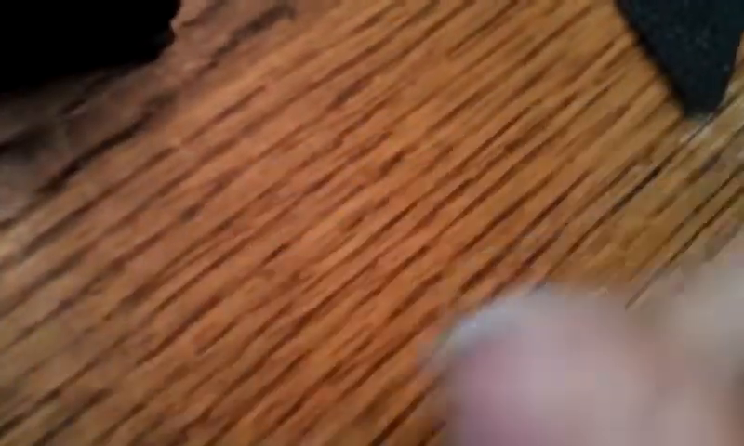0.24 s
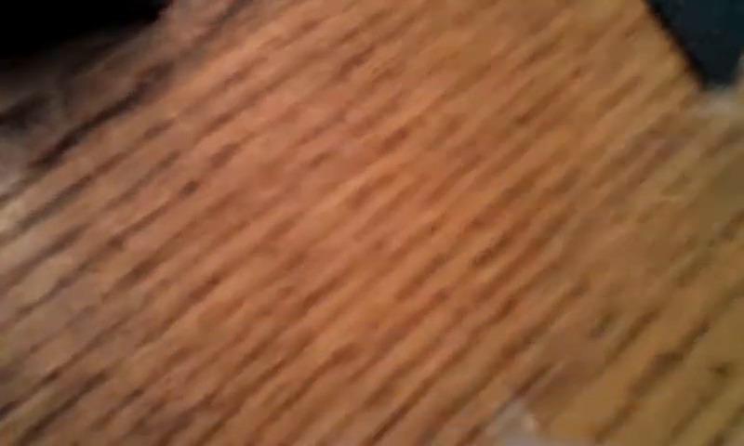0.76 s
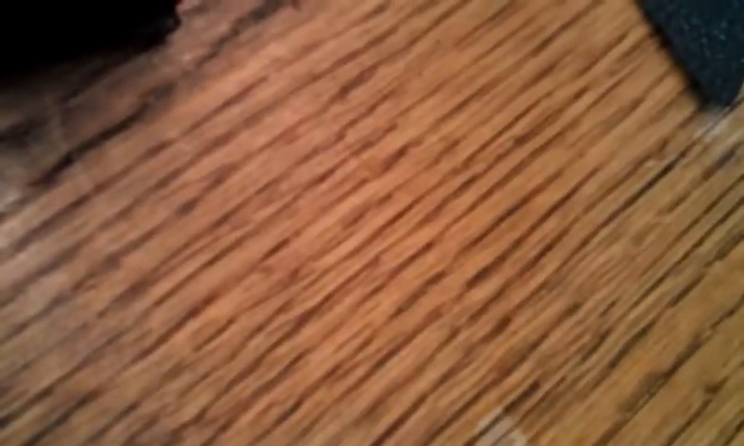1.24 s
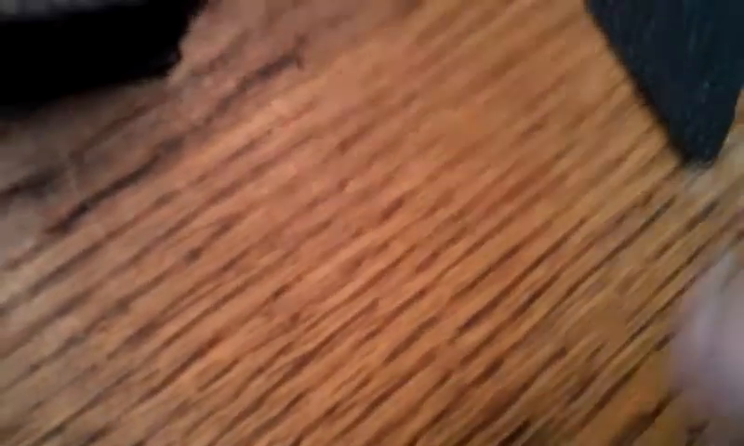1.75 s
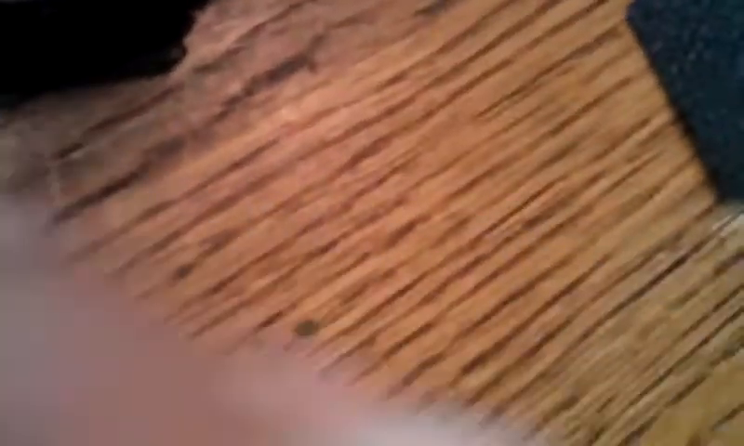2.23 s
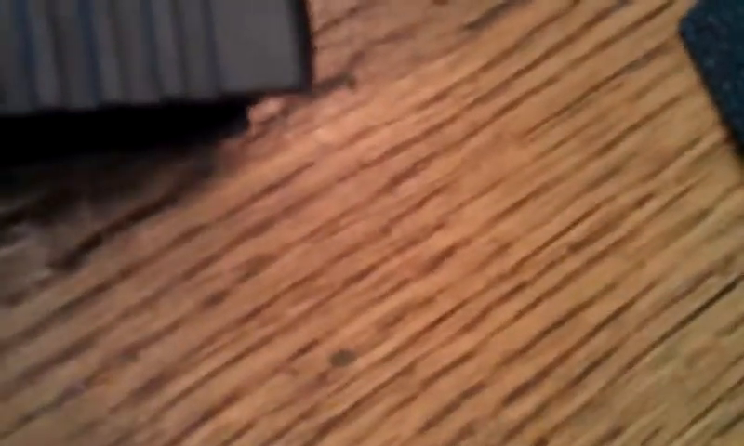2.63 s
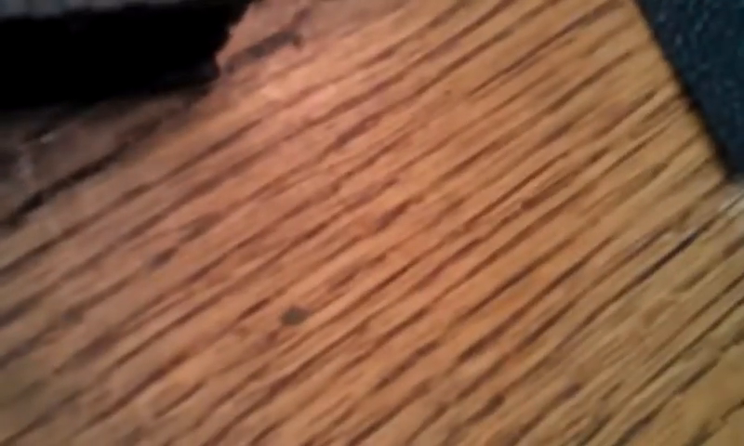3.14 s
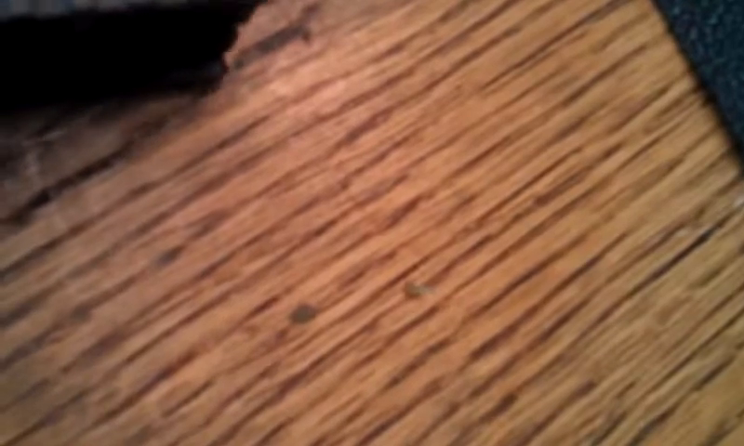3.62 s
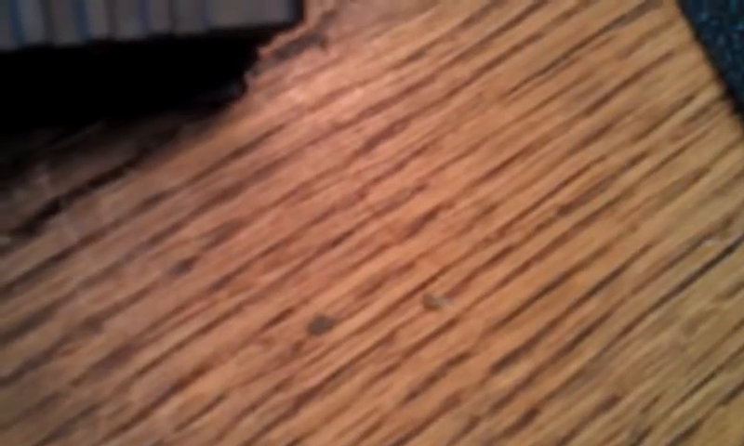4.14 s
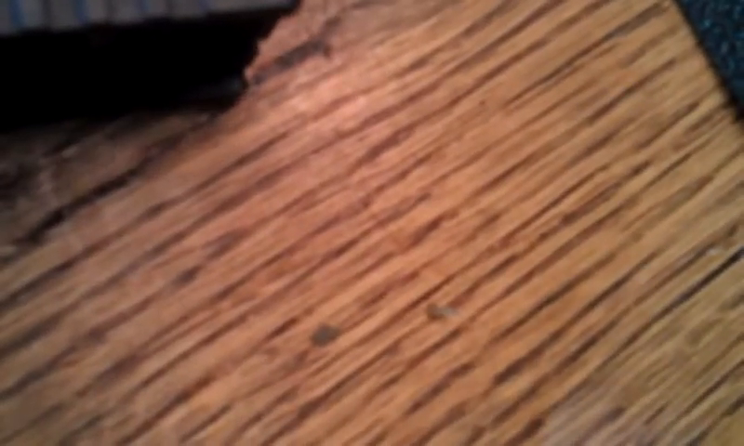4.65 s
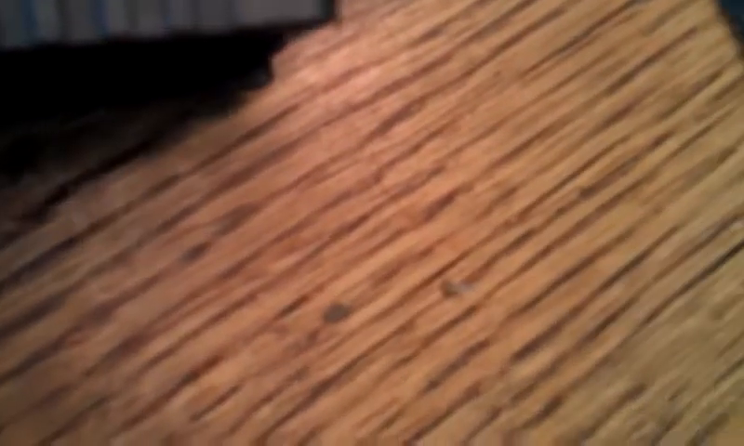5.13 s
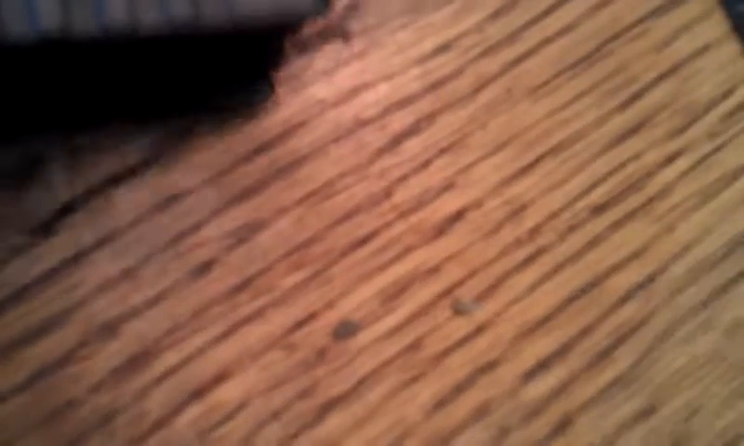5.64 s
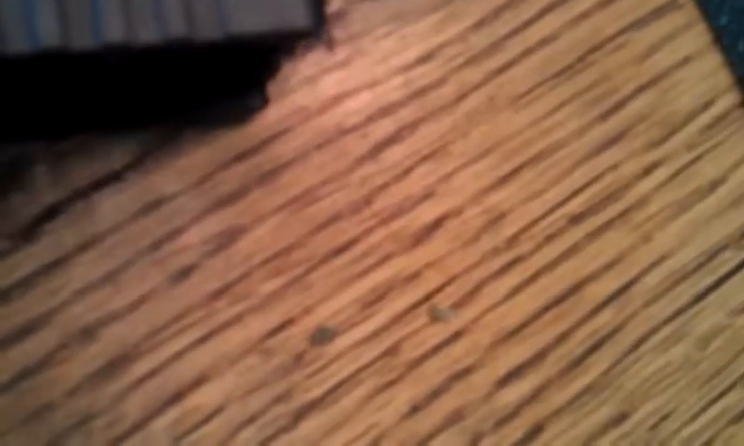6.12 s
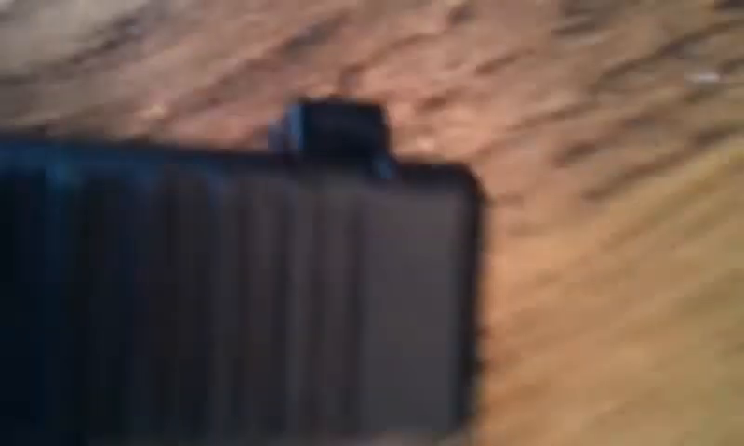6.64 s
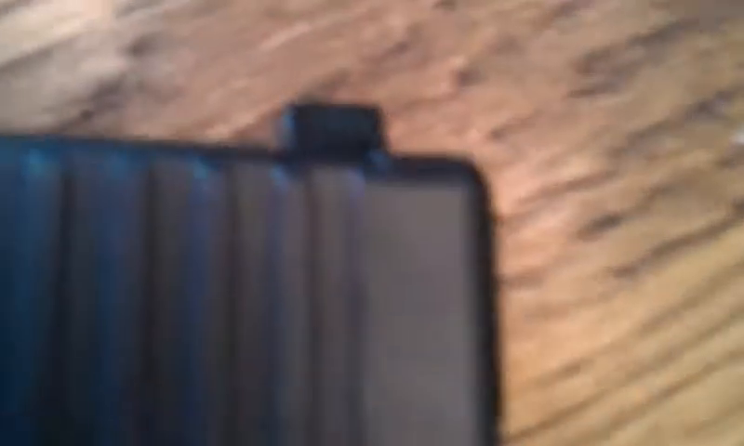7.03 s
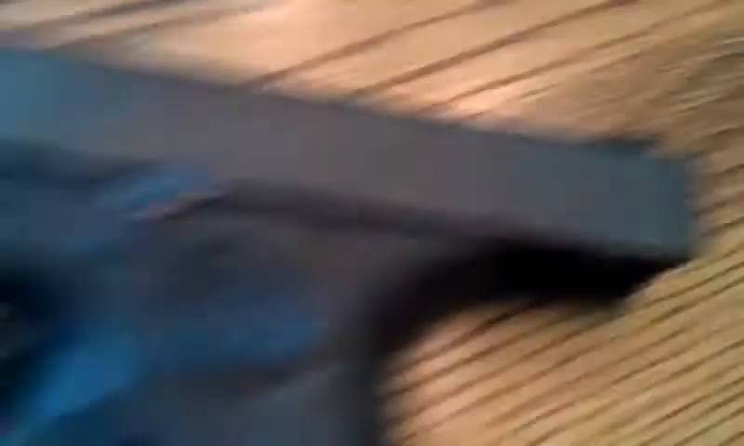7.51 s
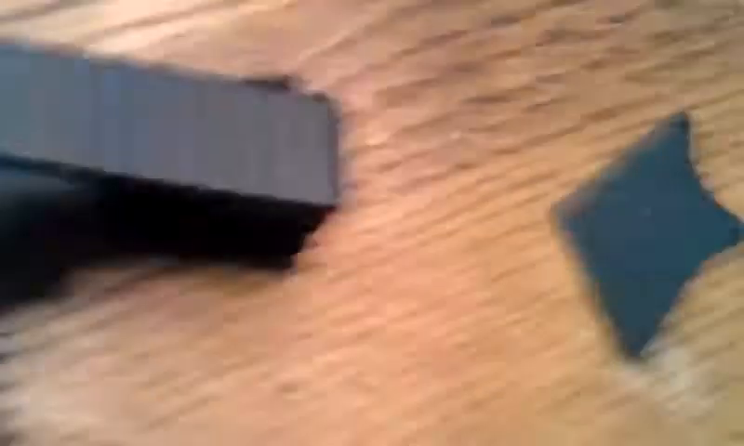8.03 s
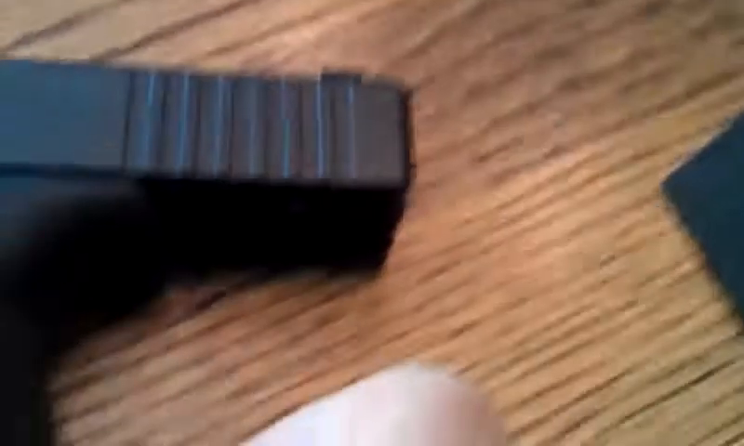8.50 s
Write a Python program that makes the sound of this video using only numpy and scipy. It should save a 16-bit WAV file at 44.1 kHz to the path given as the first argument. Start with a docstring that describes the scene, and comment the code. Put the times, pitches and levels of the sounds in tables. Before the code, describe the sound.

Hard plastic and steel parts knock on a wooden tabletop, each set-down a bright clack with a short woody thud, small rebounds and loose-part rattle. Early knocks are spaced apart with soft finger brushing between; later ones bunch up, loudest around six seconds and slightly distorted. Close, dry indoor pickup, with little bass and quiet room tone.

```python
"""A pistol and a phone are shifted about on a wooden table in a small quiet room, close to the microphone.
A loud blow comes at once; until about 5 s set-downs, rocking, bumps, ticks and faint rubs are spread out.
The contacts then crowd, with the loudest blows near 5.8 and 6.1 s, overloading the microphone, and a last
cluster near 7 s. Faint ticks and brushing fade into room tone. Hard contacts are bursts of tiny impulses with
modal ringing, bumps add tabletop modes, and slides and room tone are coloured noise."""
import sys
import numpy as np
from scipy import signal
from scipy.fft import rfft, irfft, next_fast_len
from scipy.io import wavfile
from scipy.ndimage import uniform_filter1d

SR = 44100
rng = np.random.default_rng(int(sys.argv[2]) if len(sys.argv) > 2 else 0)


def digitize_waveform(pressure):
    """Quantize a signal to 16-bit integers and store it at the path in sys.argv[1].

    Rows of a 2-D input are taken as channels; values are limited to [-1, 1].
    """
    field = np.atleast_2d(pressure).T
    bounded = np.clip(field, -1, 1)
    quanta = np.round(bounded * 32767).astype(np.int16)
    wavfile.write(sys.argv[1], SR, quanta)


N = 386607
AGE_S = np.arange(16384) / SR   # time since a touch


def from_db(db):
    return 10 ** (np.asarray(db) / 20)


def unit_energy(x):
    return x / np.sqrt(np.sum(x ** 2) + 1e-20)


def dying(t60_s, size):
    """Exponential decay, -60 dB at t60_s."""
    return from_db(-60 * AGE_S[:size] / t60_s)


def add(track, t_s, sound):
    """Mix sound into track at t_s."""
    start = max(round(t_s * SR), 0)
    track[start:start + len(sound)] += sound[:N - start]


def band(x, low_hz, high_hz):
    """Butterworth band-pass; upper edge capped at 0.45 SR."""
    sos = signal.butter(2, [low_hz, min(high_hz, .45 * SR)], "band", fs=SR, output="sos")
    return signal.sosfilt(sos, x)


def colour(x, points):
    """Causal minimum-phase filter through (f/Hz, level/dB) points."""
    size = next_fast_len(2 * len(x), real=True)
    hz, db = np.transpose(points)
    log_hz = np.log(np.maximum(np.arange(size // 2 + 1) * SR / size, 1))
    log_gain = np.log(from_db(np.interp(log_hz, np.log(hz), db)))
    cepstrum = irfft(log_gain, size)
    # fold onto the causal side
    cepstrum[1:size // 2] *= 2
    cepstrum[size // 2 + 1:] = 0
    response = np.exp(rfft(cepstrum))
    return irfft(rfft(x, size) * response, size)[:len(x)]


def noise(spectrum, grain_db=0):
    """Coloured noise, rms 1; random level per 64 samples makes it gritty."""
    grain = np.repeat(rng.standard_normal(N // 64 + 1), 64)[:N]
    grains = rng.standard_normal(N) * from_db(grain_db * grain)
    return unit_energy(colour(grains, spectrum)) * np.sqrt(N)


def mode_shapes(modes, size):
    """One decaying sine per mode; its dB sets its energy."""
    shapes = []
    for hz, db, t60_s in modes:
        ring = np.sin(2 * np.pi * hz * AGE_S[:size]) * dying(t60_s, size)
        shapes.append(from_db(db) * unit_energy(ring))
    return np.array(shapes)


def strike(shapes, spread_db):
    """Each point of contact weights the modes anew, with random sign."""
    gains = from_db(spread_db * rng.standard_normal(len(shapes)))
    weights = gains * rng.choice([-1, 1], len(shapes))
    return weights @ shapes


def chatter(t60_s, size):
    """Dying flurry of tiny contacts: random-sign impulses, energy 1."""
    return unit_energy(rng.choice([-1, 1], size) * dying(t60_s, size))


# Room tone spectrum: f/Hz, relative density/dB per Hz
ROOM_TONE_SPECTRUM = [(15, -61), (25, -27), (48, -46), (87, -19), (236, -3), (263, -5), (363, -6.5),
                      (427, -11), (714, -13.5), (1070, -12.5), (1440, -17), (4030, -19.5), (6380, -24),
                      (12200, -23), (16000, -25)]


def room_tone(level_db=-66):
    """Steady coloured noise of the quiet room."""
    return from_db(level_db) * noise(ROOM_TONE_SPECTRUM)


# Slides over the wood: start t/s, end t/s, end rub level/dB, end hiss level/dB (both relative), swell/dB
SLIDES = [(0, .12, -66.5, -81.5, -18), (.93, 1.33, -64.5, -84.5, -5.5), (2.75, 2.91, -57.5, -69.5, 11),
          (5.442, 5.54, -53.5, -69, 13.5), (5.59, 5.7, -53.5, -78.5, 4), (5.88, 5.961, -47.5, -70.5, -12.5),
          (5.984, 6.09, -52, -65, 0.5), (6.833, 6.959, -43.5, -53.5, 10), (6.985, 6.995, -27, -56, 5)]
# Fingers brushing lightly: centre t/s, relative level/dB, half length/s
BRUSHES = [(0.469, -68.5, 0.073), (1.757, -62, .035), (1.967, -66.5, .04), (3.309, -71, 0.037),
           (4.72, -60.5, .019), (6.39, -68.5, .094), (7.279, -61.5, 0.029), (7.474, -69.5, 0.019),
           (7.521, -65, 0.029), (7.59, -69.5, 0.02), (7.74, -65, 0.03), (7.984, -64, 0.023)]
# Friction spectra: f/Hz, relative density/dB per Hz
RUB_SPECTRUM = [(200, -19), (1200, -15), (2000, -5), (2900, -3), (4100, -2.5), (5200, -13), (6200, -26),
                (16000, -41)]
HISS_SPECTRUM = [(3000, -19), (7000, 0), (12000, 4), (16000, -1)]


def slides(rub_db=-2, hiss_db=-1, fade_s=0.017, flutter_db=2.5, flutter_s=0.013):
    """Friction of gun, phone and fingers on wood grain: gritty rub that catches and lets go, fine hiss on top."""
    t_s, rub, hiss = np.arange(N) / SR, np.zeros(N), np.zeros(N)
    for start_s, end_s, low_db, high_db, swell_db in SLIDES:
        fade = np.interp(t_s, [start_s - fade_s, start_s, end_s, end_s + fade_s], [0, 1, 1, 0])
        stroke = fade * from_db(np.interp(t_s, [start_s, end_s], [-swell_db, 0]))
        rub += from_db(low_db + rub_db) * stroke
        hiss += from_db(high_db + hiss_db) * stroke
    for centre_s, db, half_s in BRUSHES:
        swell = from_db(db) * np.sqrt(np.hanning(round(2 * half_s * SR)))
        add(rub, centre_s - half_s, swell)
        add(hiss, centre_s - half_s, swell)
    catches = np.interp(t_s / flutter_s, np.arange(4096), rng.standard_normal(4096))
    rub = rub * from_db(flutter_db * catches)
    return rub * noise(RUB_SPECTRUM, grain_db=2) + hiss * noise(HISS_SPECTRUM, grain_db=2)


# Tabletop bumps: t/s, relative level/dB, relative lowest-mode boom/dB, hardness/dB
KNOCKS = [(0.164, -22, -19, 1), (0.178, -23.5, -20, 4), (0.8211, -40.5, -20, 1), (1.2526, -50.5, -22, -2),
          (1.3715, -28.5, -19, -1), (1.793, -51.5, -16.5, -19.5), (2.207, -35, -20.5, -5.5),
          (2.503, -35.5, -23.5, -7), (2.929, -52, -2.5, -24.5), (3.011, -28.5, -14, -1),
          (3.83, -46, -2.5, -6.5), (4.399, -29, -19, -1), (5.112, -40, -21, 3), (5.56, -51.5, -29, -13),
          (5.666, -53.5, -25, 0.5), (5.749, -26, -29.5, -1.5), (5.874, -48, -8.5, 4.5),
          (5.935, -48, -11.5, -8), (6.1285, -18.5, -19, -0.5), (6.649, -28.5, -35, -4.5),
          (6.664, -34, -14.5, 2.5), (7.04, -28, -18.5, -1), (7.058, -29.5, -15, -2), (7.3, -45.5, -19, -10)]
# Tabletop ringing, lowest mode first: f/Hz, relative level/dB, t60/s
TABLE_MODES = [(156.7, 0, .38), (205, -8, .12), (235, -10, .14), (271, -2.5, .22), (339, -7, .15),
               (372, -1, .13), (405, -8, .08), (438, -2, .13), (484, 2, .11), (520, -1, .08), (560, -2, .1),
               (630, -1, .16), (665, -5, .09), (699, -1, .12), (764, -5, .1), (812, -2, .11),
               (899, -6, .15), (1104, -11, .1), (1310, -8, .11)]
# Thud spectrum: f/Hz, relative density/dB per Hz
THUD_SPECTRUM = [(100, -20), (160, -8.5), (300, -8), (500, 2.5), (800, -3.5), (1200, -6.5), (2000, -6.5),
                 (5000, -32), (16000, -67.5)]
BASS_DB, BASS_LOSS_PER_HARDNESS = -1.5, .8   # low modes at hardness 0; dB lost per dB of hardness


def knocks(level_db=33, boom_db=7, thud_db=-3, thud_t60_s=0.033, wood_db=-4, wood_t60_s=0.15,
           rise_s=.004, size=16384):
    """A bump gives a short thud and sets the board's main modes and many weak ones ringing."""
    out, shapes = np.zeros(N), mode_shapes(TABLE_MODES, size)
    boom = shapes[0] * (1 - np.exp(-AGE_S / rise_s))   # the whole board takes a moment to swing
    for t_s, db, lowest_db, hard_db in KNOCKS:
        thud = from_db(thud_db) * unit_energy(colour(chatter(thud_t60_s, size), THUD_SPECTRUM))
        weak_modes = from_db(wood_db) * unit_energy(band(chatter(wood_t60_s, size), 450, 1000))
        main_modes = unit_energy(strike(shapes[1:], spread_db=0.5))
        # soft, heavy bumps favour low modes; hard ones high modes
        bass_db = BASS_DB - BASS_LOSS_PER_HARDNESS * hard_db
        tilt = [(100, 0), (300, bass_db), (450, 0), (580, 0), (800, hard_db + 4.5)]
        board = unit_energy(colour(thud + weak_modes + main_modes, tilt))
        add(out, t_s, from_db(db + level_db) * (board + from_db(lowest_db + boom_db) * boom))
    return out


# Pistol set-downs, a corner touching first, then the weight, then rebounds: t/s, relative level/dB,
# brightness/dB, edge above 7 kHz/dB, chatter t60/s, first-touch lead/s, first-touch level/dB re blow,
# rebound gap/s, first-rebound loss/dB
BLOWS = [(0.1725, -6.5, 2.5, -13, .013, .0062, -7, 0.02, 8),
         (0.8202, -15, 15.5, -12.5, 0.0029, 0.0061, -6.5, 0.012, 12),
         (1.376, -14.5, 8, -11.5, 0.042, 0.0042, -5.5, 0.0076, 19),
         (2.507, -13.5, 5.5, -11, 0.021, 0.0075, -5, .0244, 6.5),
         (2.9281, -15.5, 2.5, -31, 0.021, .0086, -14, 0.047, 27),
         (3.0168, -12, 6.5, -11, .022, 0.0044, -13, 0.032, 18),
         (3.833, -15, 3.5, -18.5, 0.031, 0.0061, -21.5, 0.027, 52),
         (4.401, -16.5, 6, -13, 0.041, 0.0017, -26, 0.035, 12),
         (5.1166, -13.5, 10, -8.5, 0.038, 0.006, -9, 0.025, 31),
         (5.6705, -19, 4.5, -28, 0.033, 0.0046, -4, 0.052, 25.5),
         (5.7537, -4, 0, -11, .036, 0.0019, -5.5, 0.032, 17),
         (5.882, -12.5, 7.5, -24.5, 0.02, 0.0071, -6, 0.032, 10),
         (5.943, -24, 3, -30.5, 0.028, .0055, 3.5, 0.022, 22),
         (6.1342, -6.5, 2, -12.5, .038, .0045, -6, .0355, 15),
         (6.662, -13, 2, -20, 0.05, 0.014, -8, 0.0085, 10.5),
         (6.694, -10.5, 25, -7.5, 0.027, 0.0043, 0, 0.022, 17.5),
         (6.9953, -18, 5.5, -13.5, 0.037, 0.0084, -18.5, 0.013, 6),
         (7.0424, -17, 19, -4.5, 0.082, 0.0037, -10, 0.022, 6.5),
         (7.0548, -13, 1, -8.5, 0.096, 0.0064, -2.5, .022, 9)]
# Rocking to rest on the wood: t/s, relative level/dB, touch gap/s, loss per touch/dB
ROCKS = [(0.8419, -20, 0.037, 14), (0.9864, -36.5, 0.058, 10), (1.076, -38, 0.042, 9),
         (1.807, -41.5, 0.044, 11), (2.7308, -29, 0.05, 13.5), (4.2161, -45.5, .028, 1.5),
         (5.159, -34, .0185, -2), (5.1952, -33, .041, 5), (5.613, -32, 0.032, 3)]
# Single ticks of hard parts: t/s, relative level/dB, edge/dB
TICKS = [(0.1389, -26.5, -17.5), (0.153, -28, -32), (0.2085, -15.5, -18), (0.2177, -20, -34.5),
         (1.174, -51, -28), (1.2043, -32.5, -31.5), (1.2384, -34, -42), (1.252, -27, -45),
         (1.2617, -25.5, -37.5), (1.3264, -48.5, -27.5), (2.208, -41, -47), (2.341, -52, -17),
         (2.544, -27, -32.5), (2.712, -44, -20), (4.4429, -22, -29), (5.0323, -40, -21), (5.2115, -44, -30),
         (5.5507, -29.5, -19), (5.564, -25, -20), (5.8275, -32.5, -31), (5.852, -30, -21),
         (5.8692, -21.5, -25.5), (6.0986, -39, -30), (6.1196, -25, -50.5), (6.629, -39, -27.5),
         (6.7577, -33, -20), (6.7813, -29.5, -40), (6.8014, -32, -35), (7.3233, -39, -15),
         (7.377, -49.5, -30), (7.411, -47, -32)]
# light contacts: brightness at relative level 0 dB, its change per dB; edge loss per dB below the blow
BRIGHT_DB, BRIGHT_PER_DB, EDGE_PER_DB = 12, 0.424, 1.5
TICK_T60_S, ROCK_T60_S, REBOUND_T60_S, FIRST_TOUCH_T60_S = .018, 0.03, 0.032, 0.026
ROCK_EDGE_DB = -28.5
REBOUND_POWER = 1.4   # loss grows with this power of the rebound's number


def contacts(count=3):
    """Every touch of hard parts: t/s, relative level/dB, brightness/dB, edge/dB, chatter t60/s."""
    def light(t_s, db, edge_db, t60_s):
        """Softer contacts are duller."""
        return t_s, db, BRIGHT_DB + BRIGHT_PER_DB * db, edge_db, t60_s

    for t_s, db, bright_db, edge_db, t60_s, lead_s, first_db, gap_s, loss_db in BLOWS:
        yield light(t_s - lead_s, db + first_db, edge_db + EDGE_PER_DB * first_db, FIRST_TOUCH_T60_S)
        yield t_s, db, bright_db, edge_db, t60_s
        for k in range(1, count):
            lost_db = loss_db * k ** REBOUND_POWER
            yield light(t_s + k * gap_s, db - lost_db, edge_db - EDGE_PER_DB * lost_db, REBOUND_T60_S)
    for t_s, db, gap_s, loss_db in ROCKS:
        for k in range(count):
            yield light(t_s + k * gap_s, db - k * loss_db, ROCK_EDGE_DB, ROCK_T60_S)
    for t_s, db, edge_db in TICKS:
        yield light(t_s, db, edge_db, TICK_T60_S)


def contact(spectrum, t60_s, snap_db, tail_db, tail_t60_s=0.073, snap_t60_s=.006, size=3000):
    """A snap, a short chatter and a weak tail, in one colour; energy 1."""
    snap = from_db(snap_db) * chatter(snap_t60_s, size)
    tail = from_db(tail_db) * chatter(tail_t60_s, size)
    return unit_energy(colour(snap + chatter(t60_s, size) + tail, spectrum))


# Pistol frame and small steel parts: nominal f/Hz, relative level/dB, t60/s
FRAME_MODES = [(1533, -5.5, 0.054), (1880, -6.5, 0.01), (2020, -0.5, 0.023), (2210, -4.5, 0.046),
               (2590, -8, 0.0071), (2966, -4.5, 0.019), (3260, -0.5, 0.05), (3446, -3, 0.051),
               (3780, -2.5, 0.016), (4120, -0.5, 0.0098), (4000, -7.5, 0.026), (5060, -2.5, 0.019)]
STEEL_MODES = [(9150, -1, .08), (9320, -4, .06), (9600, 0, .1), (10500, -9, .04)]
# Frame ring filter: f/Hz, gain/dB
FRAME_FILTER = [(500, -12.5), (1500, -1.5), (5200, 0), (6500, -18.5)]
# Contact and loose-part buzz spectra: f/Hz, relative density/dB per Hz
CLACK_SPECTRUM = [(150, -27.5), (600, -19), (1100, -15), (1700, 0), (2600, 0), (3400, -7), (5500, -29.5),
                  (16000, -61.5)]
TICK_SPECTRUM = [(600, -31), (2300, -15), (3200, 9), (4200, 3), (5100, -3), (6100, -28), (16000, -59)]
EDGE_SPECTRUM = [(1000, -21), (5500, 1.5), (7800, -9.5), (9500, 4), (12000, -5.5), (16000, -17.5)]
RATTLE_SPECTRUM = [(900, -34), (1600, -1), (2300, 2), (3300, -0.5), (4300, -0.5), (5300, 0.5), (6200, -19),
                   (16000, -49.5)]
# buzz share at relative level 0 dB; softer contacts stir loose parts less
RATTLE_DB, RATTLE_PER_DB, RATTLE_T60_S = -10.5, 1, 0.074


def clicks(level_db=22.5, ring_db=-1, steel_db=-10, shift=0.017, size=3000):
    """Steel and plastic meet: hollow clack, brighter tick and sharp edge, with ringing and loose-part buzz."""
    out, steel_shapes = np.zeros(N), mode_shapes(STEEL_MODES, size)
    for t_s, db, bright_db, sharp_db, t60_s in contacts():
        # grip and point of contact shift the modes; a bright contact favours the upper ones
        modes = [(hz * (1 + shift * rng.standard_normal()), mode_db + bright_db * (hz > 3000), mode_t60_s)
                 for hz, mode_db, mode_t60_s in FRAME_MODES]
        frame = colour(strike(mode_shapes(modes, size), spread_db=6), FRAME_FILTER)
        clack = contact(CLACK_SPECTRUM, t60_s, snap_db=-10, tail_db=-8)
        tick = contact(TICK_SPECTRUM, t60_s, snap_db=-5.5, tail_db=-10.5)
        rattle = unit_energy(colour(chatter(RATTLE_T60_S, size), RATTLE_SPECTRUM))
        body = unit_energy(clack + from_db(bright_db) * tick)
        body = body + from_db(ring_db) * unit_energy(frame)
        body = body + from_db(RATTLE_DB + RATTLE_PER_DB * db) * rattle
        steel = unit_energy(strike(steel_shapes, spread_db=6.5))
        edge = contact(EDGE_SPECTRUM, t60_s, snap_db=-6.5, tail_db=-19.5) + from_db(steel_db) * steel
        add(out, t_s, from_db(db + level_db) * (unit_energy(body) + from_db(sharp_db) * edge))
    return out


# Room echo bands: low f/Hz, high f/Hz (capped by band), level/dB, t60/s
ROOM_BANDS = [(226, 497, -17, 0.28), (486, 1200, -21.5, 0.16), (1300, 5700, -28.5, 0.31),
              (4970, 24000, -26, 0.23)]


def room(x, build_s=0.0079, size=16384):
    """Diffuse banded echoes, drawn afresh per fixed-length stretch so no fixed tones stand out in the tail."""
    out, swell = np.zeros(N), 1 - np.exp(-(AGE_S / build_s) ** 2)
    for start in range(0, N, size):
        echo = np.zeros(size)
        for low_hz, high_hz, db, t60_s in ROOM_BANDS:
            echo += from_db(db) * unit_energy(band(chatter(t60_s, size), low_hz, high_hz) * swell)
        add(out, start / SR, signal.fftconvolve(x[start:start + size], echo))
    return out


def scene(low_cut_hz=126, deep_db=-21):
    """Handling noises in the room; the small microphone picks up only a trace of the bumps' deep bass."""
    bumps = knocks()
    low_cut = signal.butter(6, low_cut_hz, "high", fs=SR, output="sos")
    handling = signal.sosfilt(low_cut, slides() + bumps + clicks())
    handling = handling + from_db(deep_db) * band(bumps, 40, 97)
    return (room_tone() + handling + room(handling))[None]


def limiter(x, threshold_db=-33, slope=0.18, release_db_per_s=12):
    """Sharp treble peaks pull the gain down at once; it creeps back at a steady dB rate."""
    treble_power = uniform_filter1d(band(x, 7000, .45 * SR) ** 2, size=128)
    level_db = 10 * np.log10(np.maximum(treble_power, 1e-12))
    wanted_cut_db = slope * np.maximum(level_db - threshold_db, 0)
    recovery_db = release_db_per_s * np.arange(N) / SR
    cut_db = np.maximum.accumulate(wanted_cut_db + recovery_db, axis=-1) - recovery_db
    return x * from_db(-cut_db)


def record(dry, top=.64, lopsided=.055, cutoff_hz=15900):
    """The limiter acts, the highest peaks are rounded a little unevenly, and the top of the treble is cut."""
    rounded = top * np.tanh(limiter(dry) / top)
    uneven = rounded + lopsided * rounded ** 2
    treble_cut = signal.ellip(10, .2, 70, cutoff_hz, fs=SR, output="sos")
    return signal.sosfilt(treble_cut, uneven)


dry = scene()
out = record(dry)
digitize_waveform(out)
```